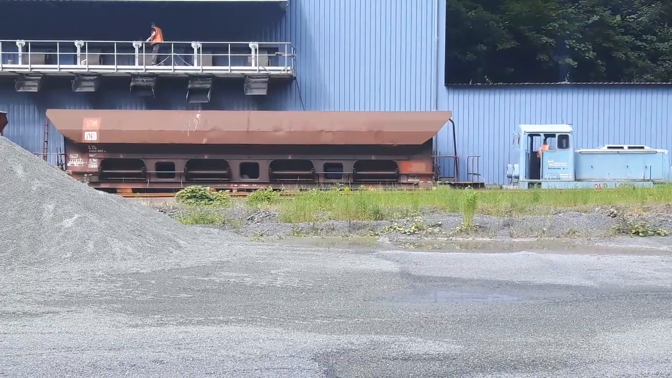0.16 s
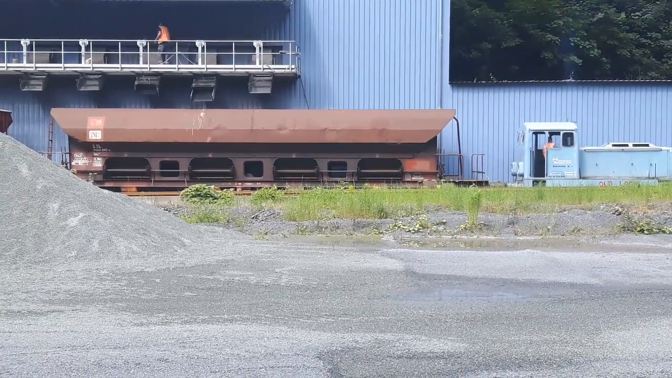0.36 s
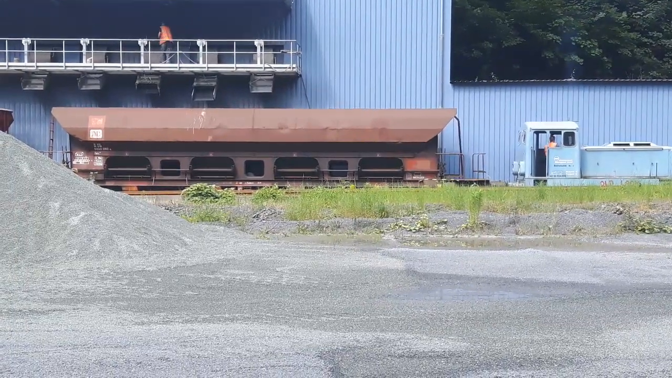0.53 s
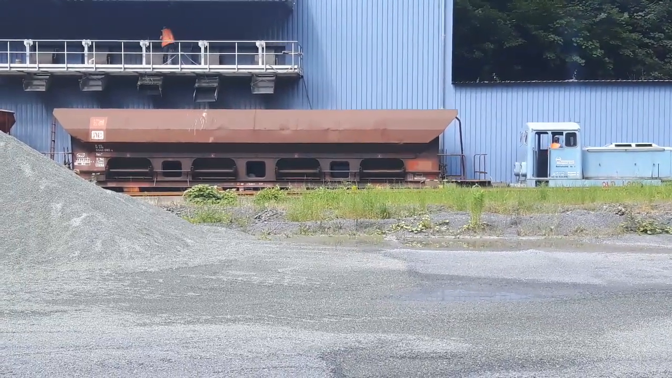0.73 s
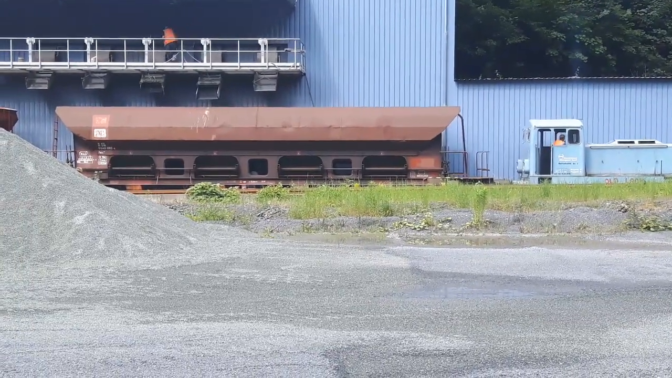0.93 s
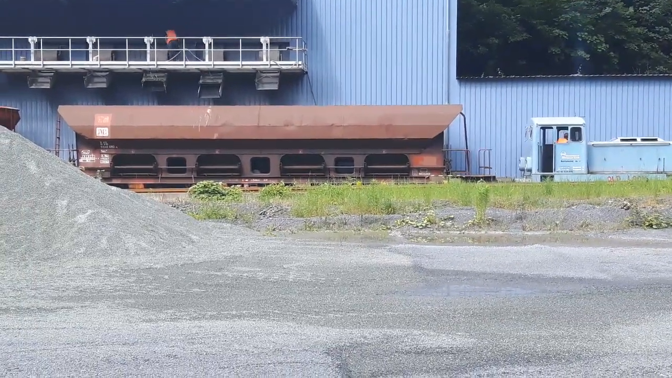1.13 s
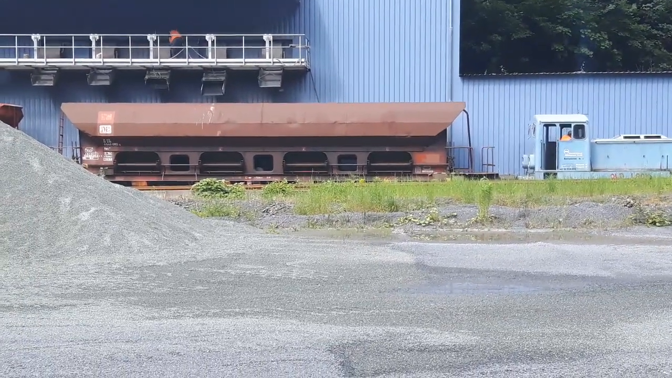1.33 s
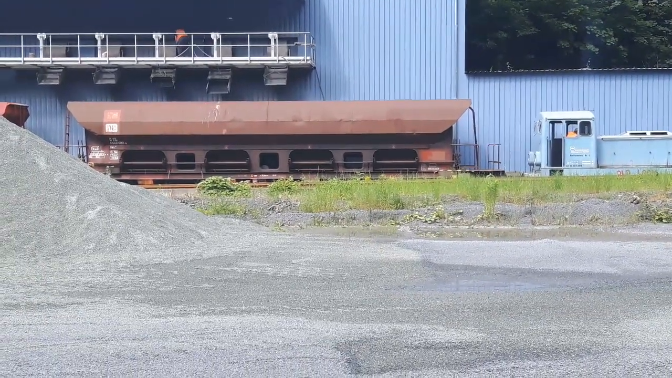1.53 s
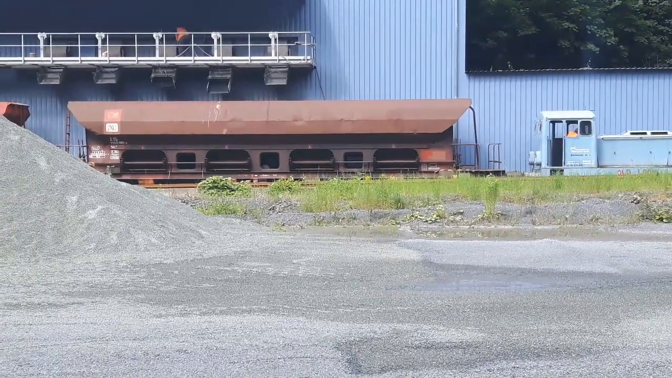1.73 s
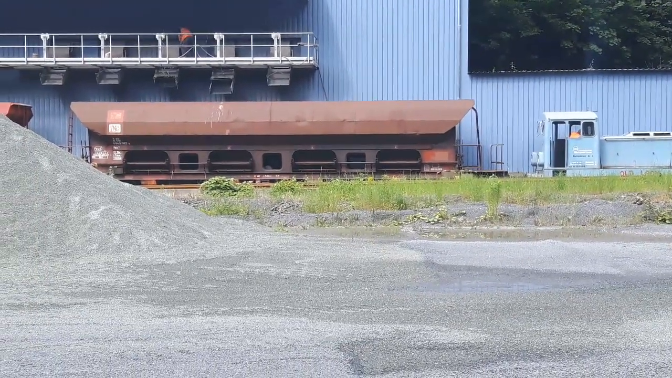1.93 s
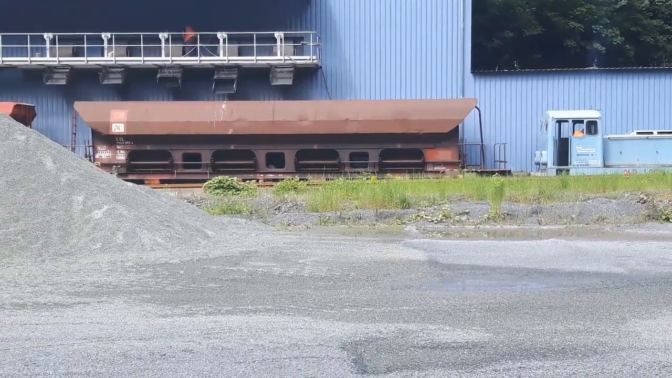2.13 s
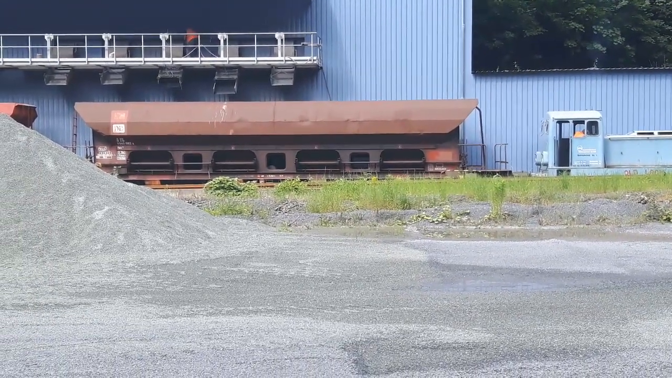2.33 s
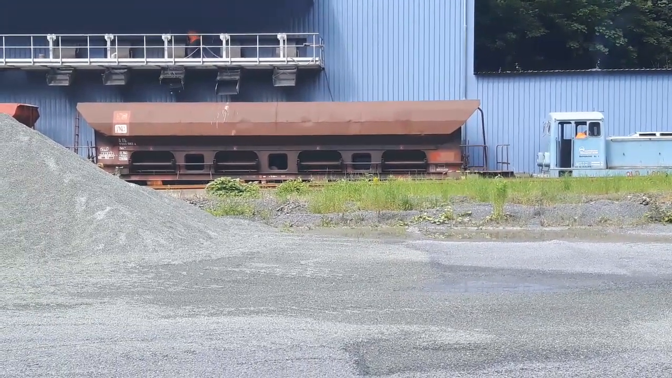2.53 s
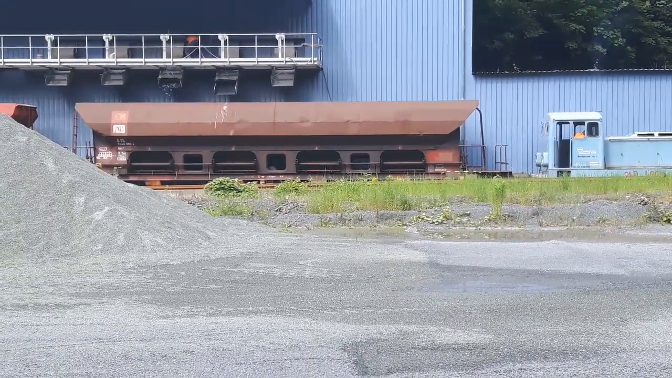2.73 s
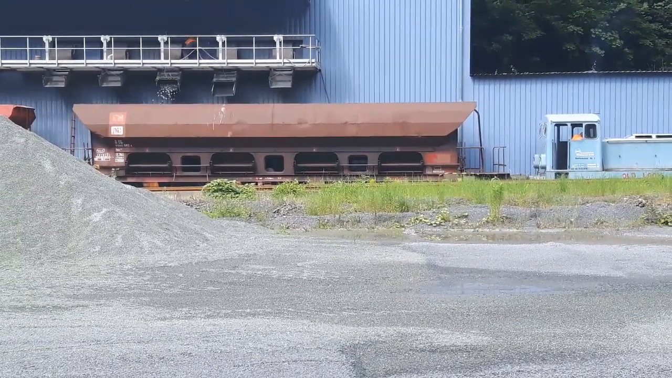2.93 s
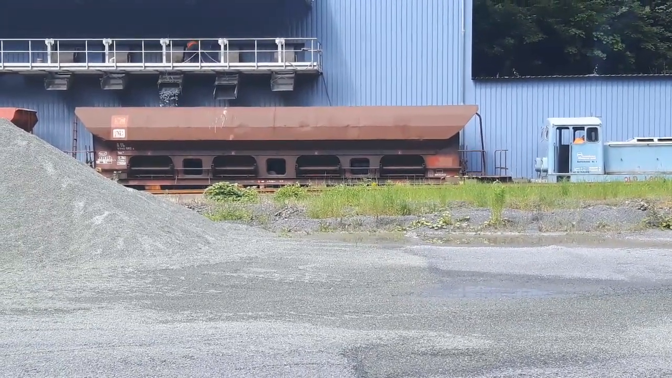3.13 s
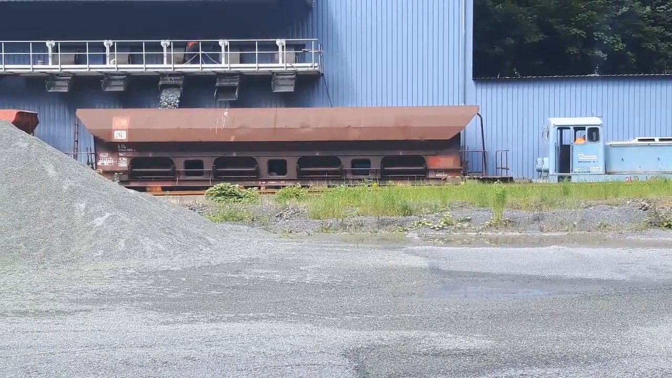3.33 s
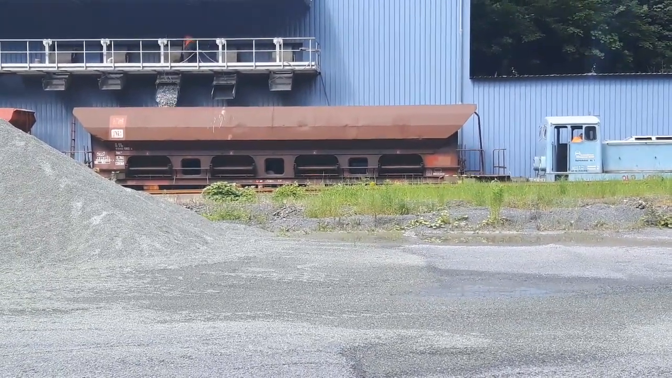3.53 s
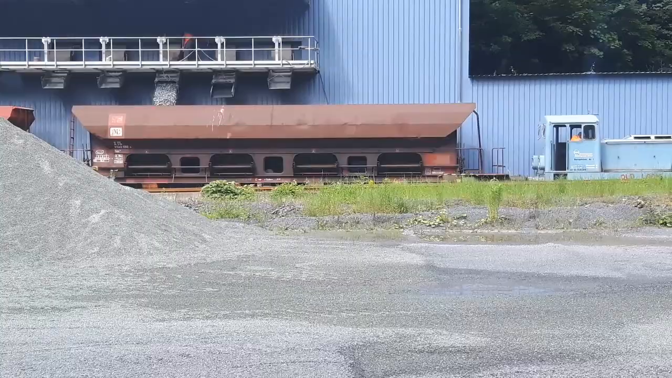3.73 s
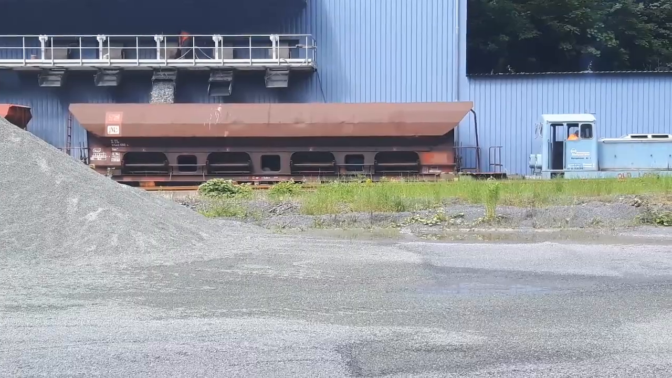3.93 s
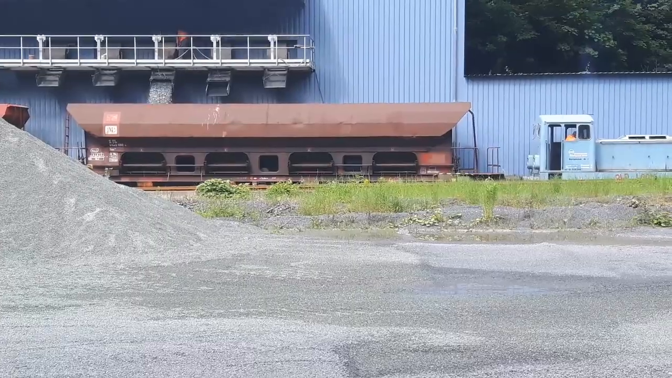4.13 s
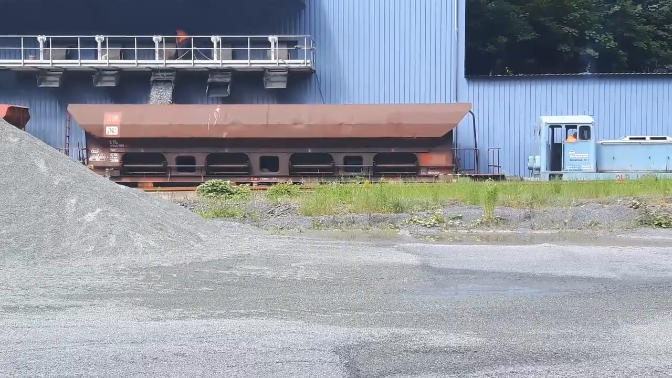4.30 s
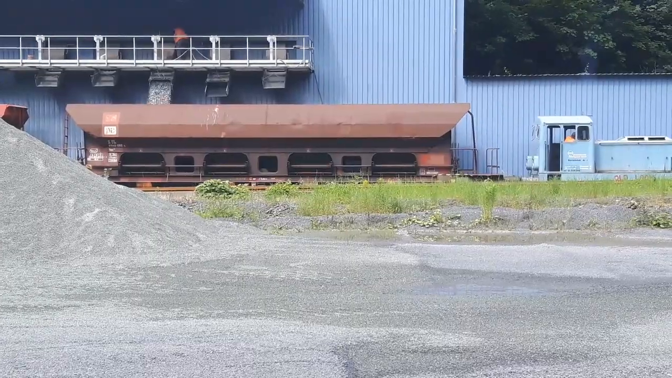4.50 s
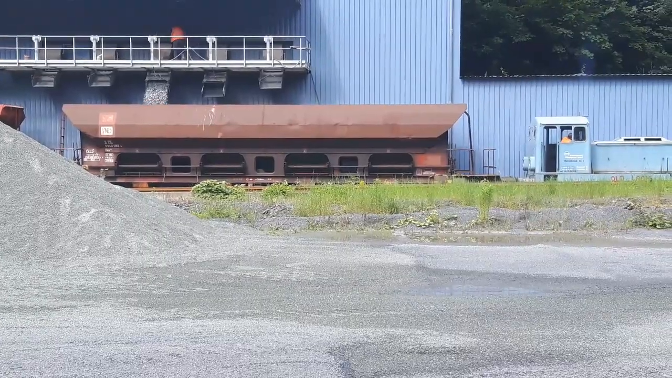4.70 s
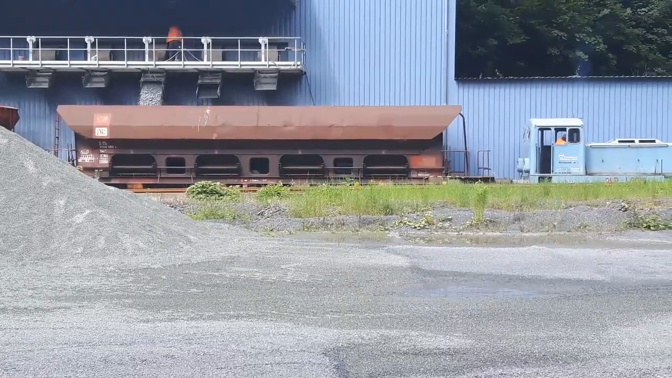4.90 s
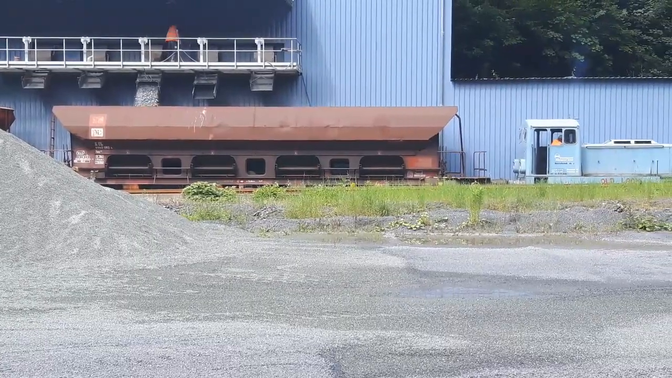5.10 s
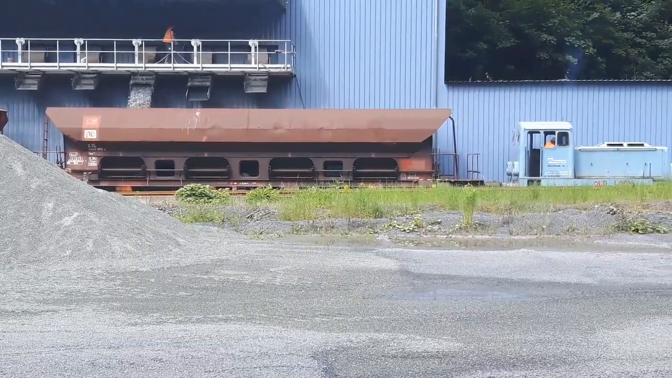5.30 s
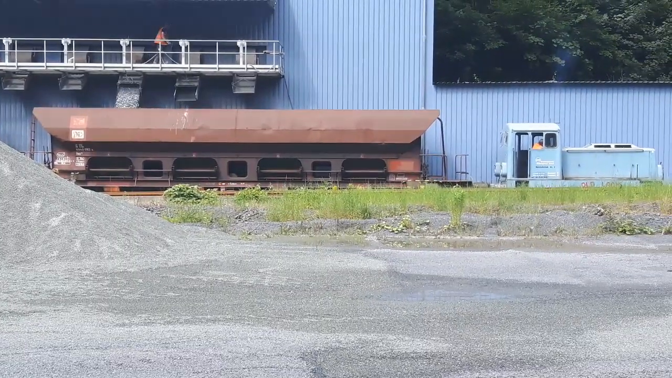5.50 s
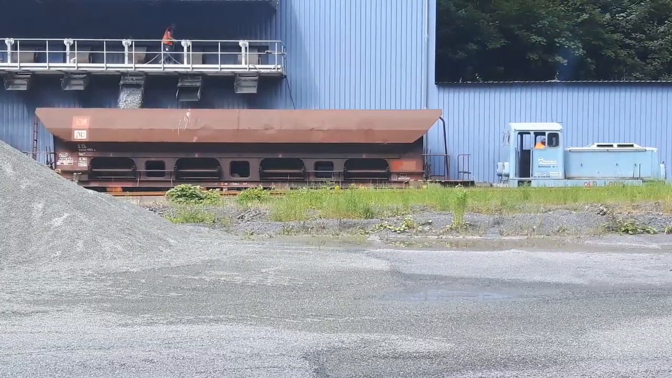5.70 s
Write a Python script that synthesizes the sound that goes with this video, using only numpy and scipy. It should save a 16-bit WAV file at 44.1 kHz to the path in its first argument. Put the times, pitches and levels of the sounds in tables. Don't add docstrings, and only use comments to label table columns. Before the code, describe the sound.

Across an open quarry yard, a small diesel locomotive idles with a low throb over the steady hiss and hum of the works. After two seconds a gate opens and stone rattles down a steel chute in quick bursts. About a second later it lands in an empty wagon, with clanging plates, sharp cracks and a hollow boom. Heard from one distant microphone, nearly mono.

```python
import sys
import numpy as np
from scipy import signal
from scipy.fft import rfft, irfft, next_fast_len
from scipy.io import wavfile
from scipy.ndimage import uniform_filter1d, map_coordinates

SR = 44100
rng = np.random.default_rng(int(sys.argv[2]) if len(sys.argv) > 2 else 0)


def rack_gain(trim_db):
    fader = np.asarray(trim_db, float)
    return 10 ** (fader / 20)


def bounce(signal):
    frames = np.transpose(np.atleast_2d(signal))
    limited = np.clip(frames, -1, 1)
    pcm = np.round(limited * 32767).astype(np.int16)
    wavfile.write(sys.argv[1], SR, pcm)


N = 253575

OPEN_S, LAND_S = 2.06, 3.265
FULL_STREAM_DB = -22

# multiple of shaft rate, level/dB
ENGINE_ORDERS = [(3, -17.5), (4, -10), (5, -8), (7, -10.5), (8, -11.5), (9, -19), (12, -14), (14, -16),
                 (28, -19)]
# f/Hz, level/dB
AUXILIARY_WHINES = [(629.8, -60.5), (802.1, -56.5), (1340, -61)]
# f/Hz, level/dB
EXHAUST_SPECTRUM = [(15, -60), (35, -32), (58, -21.5), (85, -21), (112, -13), (141, -13), (278, -7.5),
                    (350, -15), (565, -26.5), (629, -20.5), (1000, -31), (1300, -60), (2200, -120)]
# f/Hz, level/dB
WORKS_SPECTRUM = [(470, -7), (800, -3.5), (1030, -8.5), (1370, -5.5), (1830, -6.5), (2630, -15),
                  (3180, -23), (3740, -20), (5510, -26.5), (7730, -40.5), (12800, -36), (14700, -39),
                  (16000, -48)]
# t/s, rattle level/dB
CHUTE_FLOW = [
    (2.06, -41),
    (2.155, -44),
    (2.26, -37.5),
    (2.28, -32),
    (2.43, -34.5),
    (2.46, -29.5),
    (2.75, -27.5),
    (3.26, -24.5),
    (5.75, -29.5),
]
# t/s, peak level/dB, t60/s
CHUTE_BATCHES = [(2.118, -18.5, 0.12), (2.161, -13.5, 0.28), (2.222, -17, 0.11), (2.268, -12, 0.1),
                 (2.31, -28, 0.13), (2.439, -11, 0.13), (2.495, -8.5, 0.25), (2.554, -12, 0.12),
                 (2.599, -9, 0.17), (2.699, -25, 0.12), (2.744, -5.5, 0.13), (2.857, -7, 0.13),
                 (2.969, -20, 0.12), (3.055, -28, 0.12)]
# f/Hz, level/dB
RATTLE_SPECTRUM = [(180, -11.5), (300, -5), (432, -13), (841, -2.5), (1060, -7.5), (1410, -1), (2000, -6.5),
                   (2360, -4), (3280, -13.5), (3620, -27.5), (3900, -19), (5070, -53), (8580, -120)]
# f/Hz, level/dB
GRIT_SPECTRUM = [(2060, -31), (3500, 5), (3680, -24), (4100, -1.5), (4550, -6), (4870, -2), (6920, -0.5),
                 (8680, -7), (9540, -24), (10300, -22), (13400, -49), (22000, -120)]
# f/Hz, level/dB
DUST_SPECTRUM = [(6060, -34), (10300, -6), (11100, -13), (11900, -1), (12600, 3), (14100, -6), (15700, -19)]
# f/Hz, width/Hz, level/dB
PLATE_MODES = [(175.5, 22, 4), (234, 17, -0.5), (291.5, 35, -2.5), (388, 15, 1), (630, 25, -3),
               (773, 21, 5), (910, 27, 0), (1310, 47, -15.5), (1735, 100, -4.5), (2254, 89, -0.5),
               (2700, 30, -16), (3166, 29, 3)]
# f/Hz, width/Hz, level/dB
RIB_MODES = [(4150, 60, 5), (4900, 49, 6), (6370, 44, -24), (6830, 50, -6), (6750, 40, -8)]
# t/s, crash level/dB
WAGON_STREAM = [
    (3.45, -44),
    (3.5, -32.5),
    (3.67, -23),
    (4.4, -23),
    (4.8, -24.5),
    (5.15, -28.5),
    (5.27, -25.5),
    (5.5, -28.5),
    (5.6, -33.5),
]
# t/s, peak level/dB, t60/s
WAGON_BATCHES = [(3.2664, -22.5, 0.55), (3.46, -34.5, .4), (3.4785, -32, 0.31), (3.5473, -23, 0.47),
                 (3.627, -22, 0.35), (3.7194, -42, .15), (4.1984, -26, .2), (4.3974, -32, 0.13),
                 (5.155, -22.5, 0.11), (5.21, -25.5, 0.57), (5.3413, -23, 0.12), (5.4924, -30, 0.11)]
# f/Hz, level/dB
CLANG_SPECTRUM = [(240, -54), (400, -9), (436, -11), (626, -1), (891, -2.5), (1130, -5), (1290, -1),
                  (1770, -0.5), (1980, -3), (2310, -2), (3220, -8), (3650, -18), (3900, -13.5),
                  (5070, -19.5), (8580, -120)]
# f/Hz, level/dB
CRASH_SPECTRUM = [(2060, -23.5), (3500, -0.5), (3650, -32), (4040, -5.5), (4590, -20.5), (5010, -2),
                  (5470, -4), (6050, 2.5), (8540, -5.5), (9450, -13), (10500, -16), (13600, -44),
                  (22000, -120)]
# f/Hz, level/dB
SPLINTER_SPECTRUM = [(6060, -37), (10300, -13.5), (10900, -12), (11800, 2), (12600, 4), (14000, -2),
                     (15700, -13)]
# f/Hz, level/dB
BOOM_SPECTRUM = [(71, -54), (120, -4), (135, -15.5), (167, -1.5), (286, 0.5), (390, -5.5), (432, -26),
                 (480, -8.5), (620, -54), (1060, -120)]
# t/s, f/Hz, level/dB, half-length/s
HOPPER_SWELLS = [
    (3.5, 112, -30, .03),
    (3.733, 302.4, -26.5, 0.15),
    (3.747, 113, -26, .045),
    (3.834, 157.3, -25, 0.052),
    (3.987, 175.8, -31, 0.23),
    (4.093, 112, -21.5, 0.082),
    (4.2, 214.6, -31.5, 0.25),
    (4.607, 112, -32, 0.06),
    (5.14, 112, -28, 0.03),
    (5.202, 167, -27, 0.088),
]
# f/Hz, level/dB
FRAME_SPECTRUM = [(30, -55), (55, -20), (76, 2.5), (100, -14), (135, 5), (170, -8), (300, -120)]
# f/Hz, level/dB
DIFFERENCE_SPECTRUM = [(1500, -38), (3000, -7), (5500, -11), (7700, -19), (12800, -15), (14700, -22),
                       (15500, -40)]


def unit(x):
    return x / np.sqrt(np.mean(x ** 2) + 1e-20)


def curves(rows):
    s, *cols = np.transpose(rows)
    return [np.interp(np.arange(N) / SR, s, c) for c in cols]


def wobble(rate):
    knots = rng.standard_normal(int(N * rate / SR) + 4)
    return map_coordinates(knots, [np.arange(N) * rate / SR])


def coloured(x, spectrum, modes=(), lift_db=0):
    m = next_fast_len(N + 8192)
    hz = np.fft.rfftfreq(m, 1 / SR)
    f, db = np.transpose(spectrum)
    gain = rack_gain(np.interp(np.log(hz + 1), np.log(f + 1), db))
    ring = sum(rack_gain(level) / (1 + ((hz - c) / (w / 2)) ** 2) for c, w, level in modes)
    return unit(irfft(rfft(x, m) * gain * (1 + rack_gain(lift_db) * ring), m)[:N])


def patchy(x, depth_db):
    z = signal.stft(x, nperseg=1024)[2]
    field = uniform_filter1d(rng.standard_normal(z.shape), size=3, axis=0)
    field = uniform_filter1d(field, size=4, axis=1)
    return signal.istft(z * rack_gain(depth_db * unit(field)), nperseg=1024)[1][:N]


def engine():
    shaft_hz = 18.78
    beat_hz, cancel_s = 1.19, 1.0
    turn = 2 * np.pi * np.cumsum(shaft_hz * (1 + 0.0032 * wobble(4.05))) / SR
    t = np.arange(N) / SR
    slip = 2 * np.pi * beat_hz * (t - cancel_s)
    motor = rack_gain(-37 - 20 * np.clip((t - LAND_S) / 0.35, 0, 1))
    firing = np.sqrt(2) * (rack_gain(-39.5) * np.sin(6 * turn) - motor * np.sin(6 * turn - slip))
    orders = sum(rack_gain(db - 32.5 + 4.84 * wobble(9)) * np.sin(k * turn + 1.33 * wobble(8))
                 for k, db in ENGINE_ORDERS)
    whine = sum(rack_gain(db - 0.5 + 5.3 * wobble(3.6)) * np.sin(2 * np.pi * hz * t + 1.5 * wobble(6.7))
                for hz, db in AUXILIARY_WHINES)
    puff = rack_gain(0.38 * np.sin(turn) + 0.69 * wobble(8.1))
    exhaust = unit(puff * coloured(rng.standard_normal(N), EXHAUST_SPECTRUM))
    roar = rack_gain(-35 + 0.27 * wobble(2.8)) * exhaust
    return rack_gain(2.1 * wobble(13)) * firing + orders + whine + roar


def works():
    hiss = coloured(patchy(rng.standard_normal(N), depth_db=0.5), WORKS_SPECTRUM)
    return rack_gain(-43.5 + 0.64 * wobble(4.4)) * hiss


def stones(per_s, spread_db, t60, blur):
    chance, size, air = rng.random(N), rng.exponential(size=N), rng.standard_normal(N)
    knocks = np.clip((per_s / SR - chance) * SR / 100, 0, 1)
    knocks = knocks * rack_gain(2 * spread_db * np.minimum(size, 3.5))
    decay = rack_gain(-120 * np.arange(SR // 10) / SR / t60)
    crunch = np.sqrt(np.abs(signal.fftconvolve(knocks, decay)[:N]))
    return unit(crunch * air) + blur * rng.standard_normal(N)


def surges(rows, gain_db, lasts=1):
    level, t = np.zeros(N + SR), np.arange(SR // 2) / SR
    onset = np.clip(t / 0.002, 0, 1)
    for s, db, t60 in rows:
        level[round(s * SR):][:len(t)] += rack_gain(db + gain_db - 60 * t / (lasts * t60)) * onset
    return level[:N]


def chute():
    rattle_db, = curves(CHUTE_FLOW)
    over_full_db = rattle_db + 26.5
    grit_db = -17.5 + 0.29 * over_full_db
    dust_db = -29.5 + 0.45 * over_full_db
    opening = np.clip((np.arange(N) / SR - OPEN_S) / 0.027, 0, 1)
    flow = rack_gain(rattle_db + 0.13 * wobble(25.8)) * opening
    thud = np.hypot(flow, surges(CHUTE_BATCHES, gain_db=-17.5))
    chip = np.hypot(flow, surges(CHUTE_BATCHES, gain_db=-19.0, lasts=0.9))
    lumps = patchy(stones(680, spread_db=1.5, t60=0.051, blur=1.12), depth_db=0.85)
    rattle = coloured(lumps, RATTLE_SPECTRUM, PLATE_MODES, lift_db=-10.5)
    chips = patchy(stones(790, spread_db=0.5, t60=0.039, blur=0.95), depth_db=0.0)
    grit = rack_gain(grit_db) * coloured(chips, GRIT_SPECTRUM, RIB_MODES, lift_db=-3.0)
    dust = rack_gain(dust_db) * coloured(chips, DUST_SPECTRUM)
    return thud * rattle + chip * (grit + dust)


def impact(grows=1, lasts=1, slug_db=0):
    stream_db, = curves(WAGON_STREAM)
    stream = rack_gain(grows * (stream_db - FULL_STREAM_DB)) * (np.arange(N) / SR > LAND_S)
    return np.hypot(stream, surges(WAGON_BATCHES, slug_db - FULL_STREAM_DB, lasts))


def lagged(level, lag_s):
    u = np.arange(SR // 2) / SR / lag_s
    store = u * np.exp(-u)
    return np.sqrt(np.abs(signal.fftconvolve(level ** 2, store / np.sum(store))[:N]))


def wagon():
    uneven = wobble(30)
    blows = patchy(stones(900, spread_db=1.0, t60=0.01, blur=1.42), depth_db=0.93)
    clang = coloured(blows, CLANG_SPECTRUM, PLATE_MODES, lift_db=-3.5)
    ringing = lagged(impact(slug_db=-0.56), lag_s=0.022)
    clang = rack_gain(FULL_STREAM_DB + 9.5 + 0.073 * uneven) * ringing * clang
    chips = patchy(stones(590, spread_db=2.0, t60=0.036, blur=1.43), depth_db=1.5)
    crash = coloured(chips, CRASH_SPECTRUM, RIB_MODES, lift_db=-7.0)
    crash = rack_gain(FULL_STREAM_DB + 0.15 * uneven) * impact() * crash
    sharp = impact(grows=1.1, lasts=0.69, slug_db=2.5)
    splinter_level = rack_gain(-27 + 0.2 * uneven + 1.3 * wobble(13)) * sharp
    return clang + crash + splinter_level * coloured(chips, SPLINTER_SPECTRUM)


def hollow():
    t = np.arange(N) / SR
    boom = patchy(rng.standard_normal(N), depth_db=1.5)
    boom = coloured(boom, BOOM_SPECTRUM, PLATE_MODES, lift_db=-5.0)
    boom_db = -20 - 2 * np.clip((t - 4.04) / 0.59, 0, 1)
    boom = rack_gain(boom_db) * lagged(impact(), lag_s=0.13) ** 0.61 * boom
    waver = 0.56 * wobble(8)
    swell = sum(rack_gain(db) * np.exp(-0.5 * ((t - s) / half) ** 2) * np.sin(2 * np.pi * hz * t + waver)
                for s, hz, db, half in HOPPER_SWELLS)
    settling = np.exp(-0.5 * ((t - 5.23) / 0.57) ** 2)
    shake = rack_gain(-54.5) + rack_gain(-28.5) * settling
    return boom + np.sqrt(2) * swell + shake * coloured(rng.standard_normal(N), FRAME_SPECTRUM)


def scene():
    landed = np.clip((np.arange(N) / SR - LAND_S) / 0.0026, 0, 1)
    yard = engine() + works() + chute() + landed * (wagon() + hollow())
    shared, apart = rng.standard_normal((2, N))
    difference = rack_gain(-82.5) * coloured(apart, DIFFERENCE_SPECTRUM)
    return yard + rack_gain(-78) * shared + difference * np.array([[1], [-1]])


def top_cut(x):
    return signal.sosfilt(signal.butter(12, 16470, fs=SR, output="sos"), x)


def record(dry):
    overload, low_hz, top_hz = 1.15, 45, 15760
    loud = dry / (1 + np.abs(dry / overload) ** 4) ** (1 / 4)
    hz = np.fft.rfftfreq(N, 1 / SR)
    band = (hz < top_hz) / np.sqrt(1 + (low_hz / (hz + 1)) ** 10)
    mix = irfft(rfft(loud) * band, N)
    return top_cut(mix)


dry = scene()
out = record(dry)
bounce(out)
```